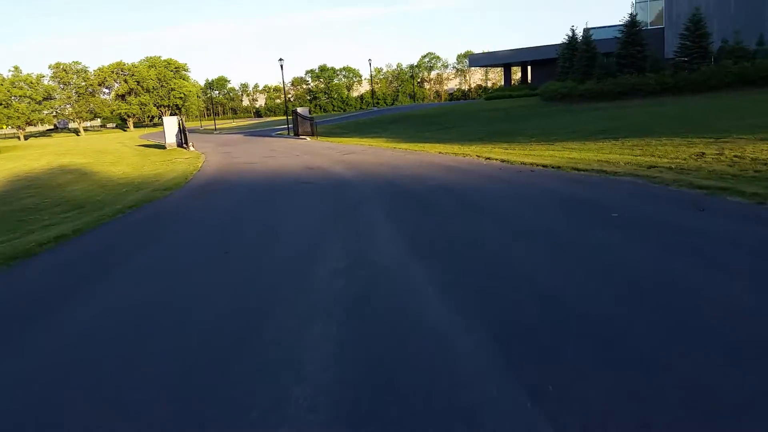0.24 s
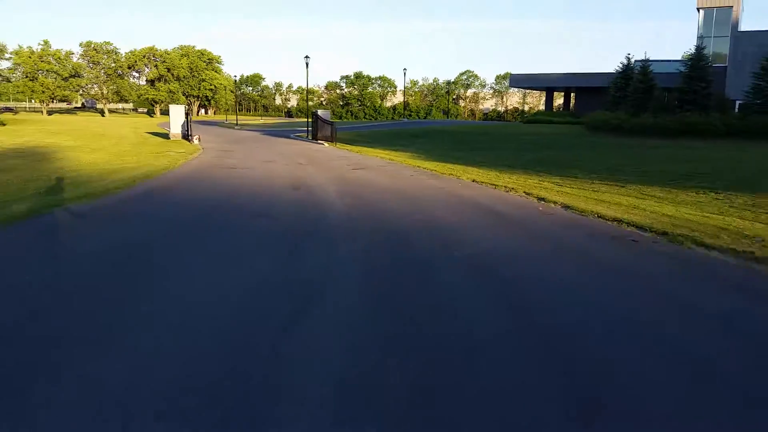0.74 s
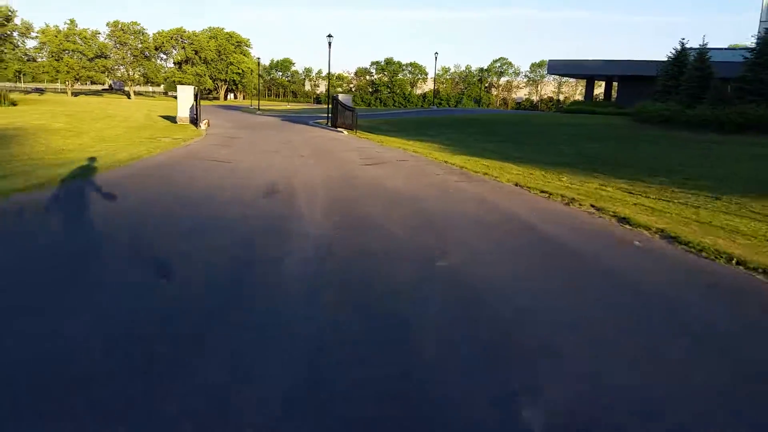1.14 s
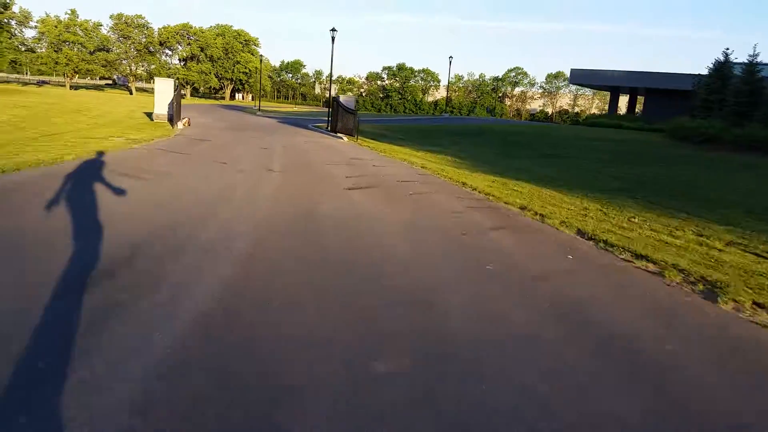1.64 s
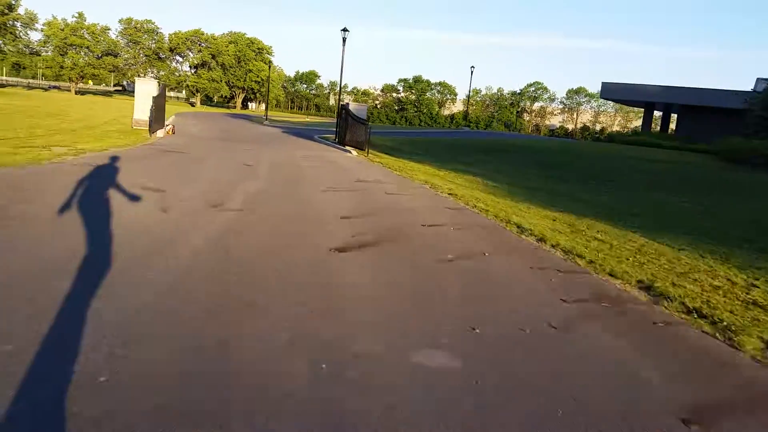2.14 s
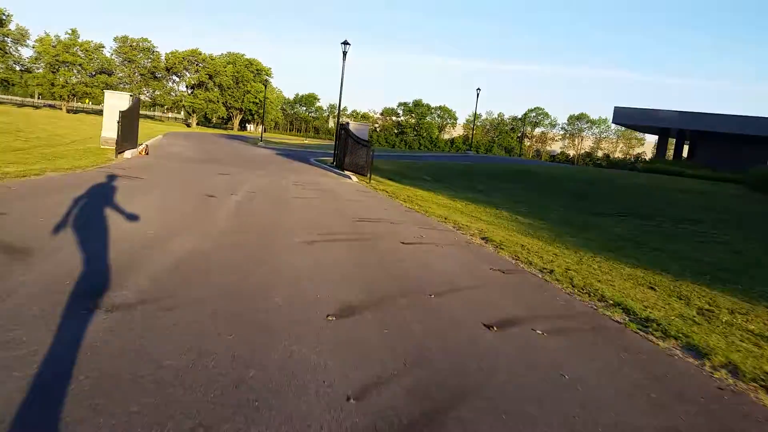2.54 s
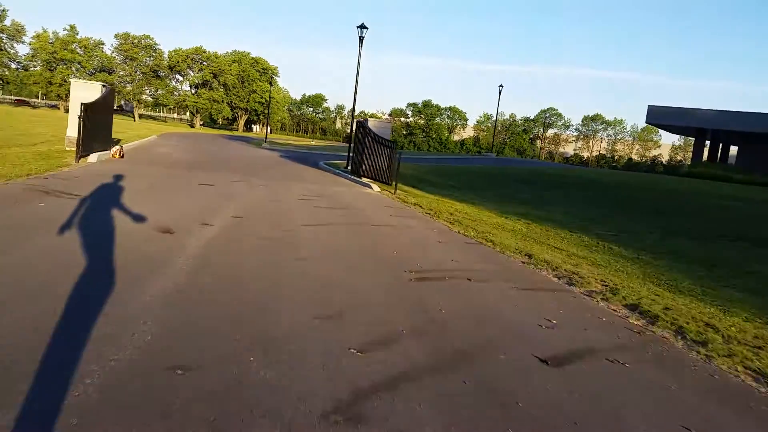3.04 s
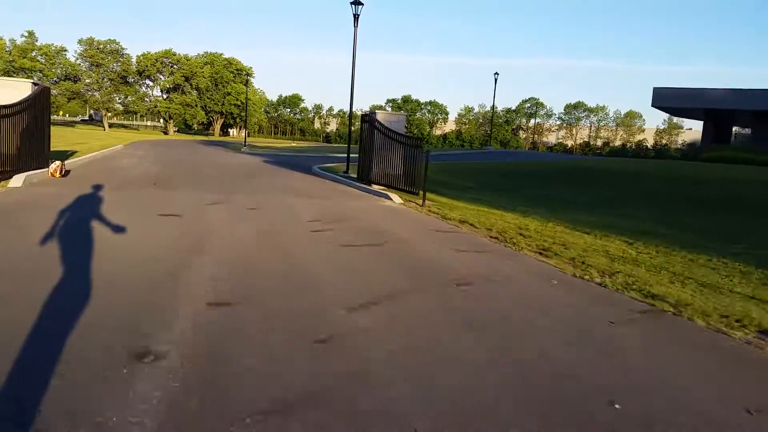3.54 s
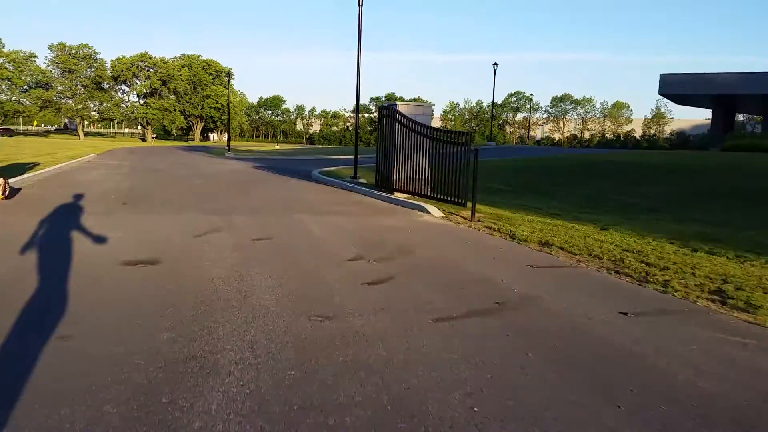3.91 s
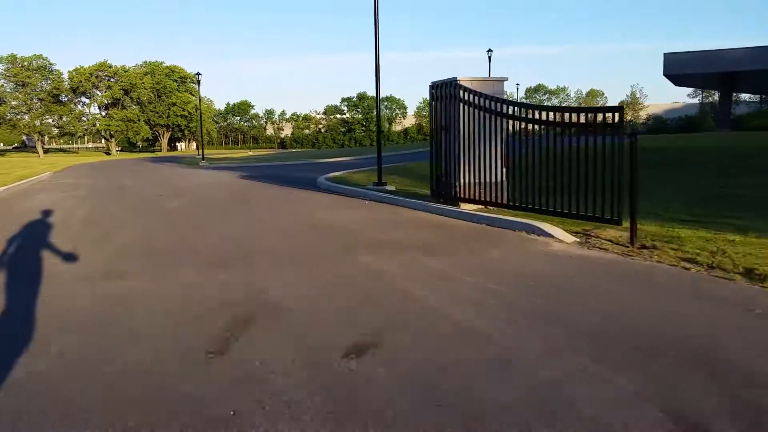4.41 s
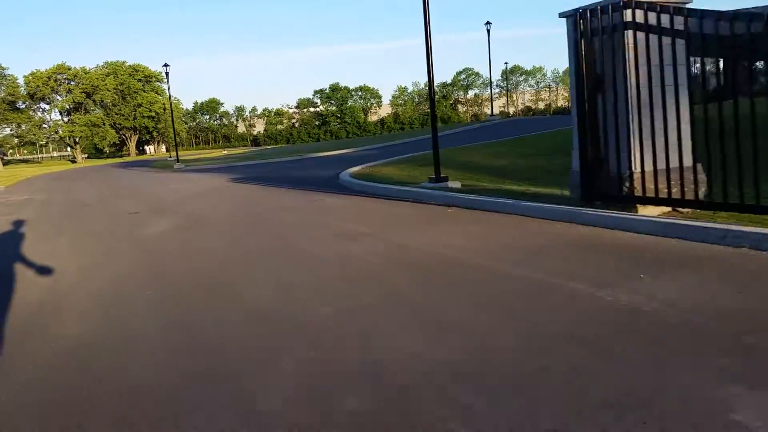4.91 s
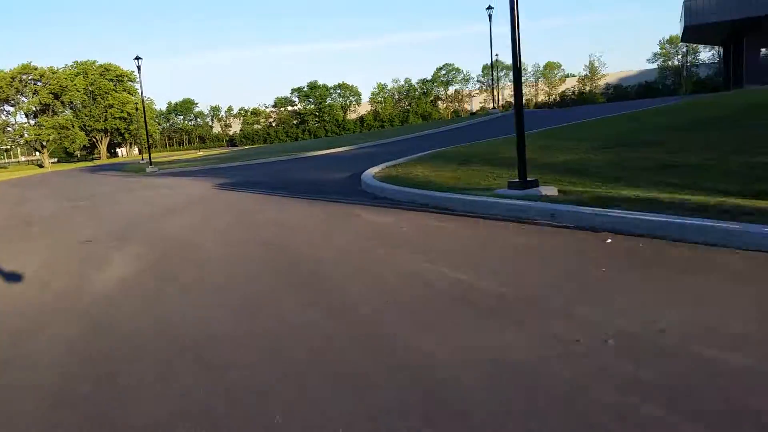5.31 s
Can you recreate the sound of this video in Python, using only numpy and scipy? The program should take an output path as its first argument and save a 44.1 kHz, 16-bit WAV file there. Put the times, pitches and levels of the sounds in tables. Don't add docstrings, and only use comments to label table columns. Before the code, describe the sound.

Continuous loud low wind covers a skateboard rolling on smooth asphalt. Pops and fluttering gusts crowd both channels for the first two and a half seconds, then wind leans left and the right grows quieter. A hollow mid-pitched wheel hum and fine sand crackle persist, faint falling bird whistles slip through, and two heavy left thumps land around five seconds.

```python
import sys
import numpy as np
from scipy import signal
from scipy.fft import rfft, irfft, next_fast_len
from scipy.io import wavfile
from scipy.ndimage import uniform_filter1d, minimum_filter1d

SR = 44100
rng = np.random.default_rng(int(sys.argv[2]) if len(sys.argv) > 2 else 0)


def transcribe(signal):
    frames = np.atleast_2d(signal).T
    limited = np.clip(frames, -1, 1)
    pcm = np.round(limited * 32767).astype(np.int16)
    wavfile.write(sys.argv[1], SR, pcm)


def rack_gain(trim_db):
    fader = np.asarray(trim_db, float)
    return 10 ** (fader / 20)


N = 245181

# time_s, push_left_db, push_right_db, churn_left_db
AIRSTREAM = [(0, -16, -16.5, -35), (.35, -17, -20, -32), (.7, -19.5, -16, -36.5), (1.05, -14, -15.5, -30),
             (1.3, -16, -15, -35), (1.55, -12, -14, -29), (1.9, -14.5, -15, -29.5),
             (2.3, -11.5, -15.5, -30), (2.5, -12.5, -17.5, -32), (2.75, -12.5, -22, -36.5),
             (3.2, -16, -21, -41.5), (3.5, -15, -22.5, -47), (4.0, -14, -21, -42), (4.2, -13.5, -22.5, -39),
             (4.6, -11, -21, -38.5), (4.95, -10.5, -25, -37.5), (5.2, -13.5, -27.5, -36),
             (5.56, -14.5, -22.5, -40.5)]
LAYER_CENTRES_HZ = [70, 140, 410, 1970]
PUSH_SLOPE_LEFT = [1.256, 1.07, 0.073, .05]
CHURN_SLOPE_LEFT = [-0.098, -0.033, 0.14, 0.93]
PUSH_SLOPE_RIGHT = [1.012, 0.94, 1.7, 1.9]
# freq_hz, density_db_per_hz
WIND_COLOUR_LEFT = [(20, -22.5), (35, -24), (60, -0.5), (90, 2), (140, -2), (220, -8.5), (330, -13.5),
                    (500, -17.5), (750, -25.5), (1100, -26.5), (1700, -38.5), (2500, -46), (3700, -61.5),
                    (4650, -63), (5500, -70.5)]
WIND_COLOUR_RIGHT = [(20, -26.5), (35, -4.5), (60, -4.5), (90, -4), (140, 3), (220, -3), (330, -7.5),
                     (500, -9.5), (750, -23), (1100, -26), (1700, -44), (2500, -51.5), (3700, -71),
                     (4650, -77), (5500, -72.5)]
# freq_hz, shared_burst_db, own_flicker_db
GUSTINESS = [(30, 1, 0), (153, 0.36, 0), (534, 2.5, 1.5), (1520, 1, 0.5), (5000, 2, 1.2)]
# peak_s, peak_db
POPS_LEFT = [(0.0002, -22), (0.0937, -26), (0.1607, -26), (0.1649, -16), (0.1713, -25), (0.177, -27),
             (0.3172, -35), (0.8493, -21), (1.0204, -19), (1.0771, -27), (1.102, -29), (1.2575, -23),
             (1.2872, -23), (1.3139, -22), (1.5499, -22), (1.688, -25), (1.7449, -20), (1.7677, -25),
             (1.7729, -16), (1.9788, -29), (2.0582, -24), (2.1209, -25), (2.1443, -16.5), (2.1548, -25),
             (2.1854, -22), (2.2586, -25), (2.3158, -23), (2.3495, -18), (2.3542, -29), (2.3812, -21),
             (2.5378, -19), (2.5509, -23), (2.5725, -21), (2.5786, -20), (2.6475, -28), (2.6707, -27),
             (2.6801, -22), (2.7034, -22), (3.0577, -22), (3.0948, -28), (3.1547, -21), (3.1589, -24),
             (4.7402, -17), (4.7551, -27), (4.9032, -26), (5.0394, -19), (5.0996, -19), (5.1045, -18.5),
             (5.1349, -24), (5.2804, -21), (5.3464, -31), (5.4092, -28), (5.4198, -20.5), (5.4308, -26),
             (5.4931, -21), (5.5031, -19), (5.5072, -23), (5.5126, -29)]
POPS_RIGHT = [(0.0009, -33), (0.1609, -28), (0.4003, -29), (0.4313, -38), (0.6555, -28), (0.6798, -39),
              (0.7199, -35), (0.8553, -33), (0.8623, -33), (0.8673, -19), (0.8949, -32), (0.9411, -31),
              (0.9463, -20), (1.0092, -30), (1.0337, -27), (1.0873, -26), (1.103, -32), (1.1717, -34),
              (1.2551, -30), (1.3992, -32), (1.4384, -36), (1.4439, -35), (1.4517, -27), (1.4751, -26),
              (1.5344, -33), (1.5846, -27), (1.6052, -23), (1.6139, -34), (1.6834, -30), (1.6963, -30),
              (1.7178, -27), (1.723, -22), (1.7454, -32), (1.7919, -26), (1.8354, -30), (1.8665, -27),
              (1.8738, -31), (1.8849, -34), (1.911, -31), (1.9306, -32), (1.9765, -29), (2.0068, -33),
              (2.0685, -35), (2.1023, -34), (2.1117, -29), (2.1667, -34), (2.172, -23), (2.1905, -29),
              (2.249, -33), (2.26, -19), (2.2672, -34), (2.4403, -33), (2.4828, -34), (2.8088, -42),
              (3.0634, -29), (3.3688, -43), (4.2079, -37), (5.1904, -41)]
# peak_s, peak_db
THUMPS_LEFT = [
    (0.715, -34),
    (2.506, -27),
    (2.845, -20),
    (2.911, -14),
    (2.989, -8.5),
    (3.53, -42),
    (4.859, -2),
    (4.904, -16),
    (5.07, -1),
    (5.156, -21),
]
# peak_s, peak_db
FLURRIES_LEFT = [(0.854, -22.5), (1.4784, -21), (1.494, -21), (1.5155, -18), (1.53, -23), (2.02, -17),
                 (2.0553, -17), (2.1988, -16), (2.42, -15), (2.46, -19.5), (2.845, -24.5), (2.87, -19.5),
                 (2.886, -26), (3.955, -25), (4.49, -23), (5.185, -31)]
# time_s, deck_drone_db, wheel_ring_db
ROLLING = [(0, -28, -24), (.12, -25, -24.5), (.7, -22, -30), (.9, -23, -20.5), (1.04, -27.5, -31),
           (1.18, -23, -37), (1.28, -13, -20), (1.36, -24, -26), (1.9, -21.5, -24), (2.14, -25.5, -22),
           (2.42, -19.5, -24.5), (2.5, -28.5, -27), (3.1, -25.5, -26.5), (3.8, -25, -22), (4.17, -25, -21),
           (4.45, -31.5, -21), (4.95, -28.5, -29.5), (5.56, -30, -22.5)]
# centre_hz, width_hz, left_db, right_db
DECK_MODES = [
    (420.3, 86.5, -2.0, -5),
    (567, 55, -16.5, -27),
]
WHEEL_MODES = [
    (907, 106, -14.5, -20.5),
    (1164, 100, -26.5, -30.5),
    (2120, 357, -22, -33.5),
    (4370, 1200, -45.5, -52),
]
# time_s, level_db
SAND = [(0.0, -57), (0.36, -60.5), (1.39, -58), (1.75, -61), (1.93, -63), (2.35, -60), (2.72, -68),
        (2.96, -69), (3.22, -66), (3.58, -62.5), (3.98, -58.5), (4.37, -56), (4.57, -55.5), (4.74, -58.5),
        (4.99, -59), (5.23, -55.5), (5.45, -59), (5.56, -62.5)]
# start_s, over_hiss_db
PATCHES = [(0.541, 3), (0.654, 5.5), (0.938, 6.5), (1.12, 5.5), (1.398, 10.5), (2.046, 8), (2.661, 8),
           (2.976, 9.5), (3.331, 6.5), (3.788, 12), (3.803, -1.5), (3.959, 14), (3.987, 6), (4.037, 2),
           (4.287, 10), (4.642, 2.5), (4.701, 6.5), (5.183, 8)]
# freq_hz, density_db_per_hz
GRIT_COLOUR_LEFT = [(3000, -13), (4000, 0), (4650, -5.5), (5000, -34.5), (5600, -9), (6600, -10), (7600, 0),
                    (8600, -7), (10000, -11.5), (11200, -6.5), (12300, -1), (13800, -9), (15000, -5.5),
                    (15700, -1)]
GRIT_COLOUR_RIGHT = [(3000, -4), (4200, -7.5), (5300, -20), (6500, -15), (7600, -24.5), (8600, -24.5),
                     (10000, -34.5), (11200, -18), (12300, -10.5), (13800, -5.5), (15000, -1), (15600, 2.5)]
# time_s, pitch_hz, level_db
BIRD_CALLS = [
    [(.77, 4680, -70), (.795, 4340, -59), (.82, 4090, -72), (.86, 3850, -67), (.92, 3660, -61),
     (1.0, 3480, -58.5), (1.07, 3340, -62), (1.1, 3290, -66), (1.145, 3250, -63)],
    [(.70, 3750, -72), (.76, 3500, -70), (.85, 3320, -70), (.95, 3170, -72)],
    [(1.32, 4260, -65), (1.345, 4100, -59), (1.362, 3960, -67), (1.40, 3810, -60), (1.465, 3700, -65)],
    [(2.77, 3950, -75), (2.82, 3720, -74), (2.89, 3450, -75)],
    [(2.905, 6700, -78), (2.93, 6580, -76), (2.955, 6450, -78)],
    [(3.035, 5250, -70), (3.06, 5030, -68), (3.11, 4900, -67), (3.165, 4940, -59.5), (3.2, 5040, -63),
     (3.235, 5110, -75)],
    [(3.59, 4170, -66), (3.615, 4030, -62), (3.64, 3840, -68), (3.685, 3600, -74)],
]

PORT_LAG_S, PORT_FLIP_HZ = .00014, 11000
NOTCH_HZ, NOTCH_WIDTH_HZ, NOTCH_DEPTH = 5300, 600, .45
POP_LEAD_S, POP_TOP_HZ = .0004, 2400
FRAY_SHARE = .05
THROB_CEILING = 1.31
SWAY_DB, SWAY_PER_S = 1.5, 4
GRIT_TURN_DB_PER_DB = .22
TOP_CUT_HZ = 15850


def unit(x):
    return x / np.sqrt(np.mean(x ** 2) + 1e-20)


def in_time(rows):
    time_s, *columns = np.transpose(rows)
    return [np.interp(np.arange(N) / SR, time_s, column) for column in columns]


def at_hz(points, hz, order=1):
    points = np.array(points)
    return np.interp(np.log(hz), np.log(points[:, 0]), points[:, order])


def drift(rate_hz):
    r = np.exp(-40 * np.pi * rate_hz / SR)
    noise = rng.standard_normal(N // 20 + 2002)
    slow = signal.lfilter([1], [1, -2 * r, r * r], noise)[2000:]
    return np.interp(np.arange(N) / 20, np.arange(len(slow)), unit(slow))


def coloured(x, colour, slope_db):
    size = next_fast_len(N, real=True)
    hz = np.fft.rfftfreq(size, 1 / SR) + 1
    octaves_above = np.maximum(np.log2(hz / colour[-1][0]), 0)
    octaves_below = np.maximum(np.log2(colour[0][0] / hz), 0)
    shape_db = at_hz(colour, hz) - slope_db * (octaves_above + octaves_below)
    return hz, rfft(x, size) * rack_gain(shape_db)


def wave(spectrum):
    return irfft(spectrum)[:N]


def resonance(x, hz, width_hz):
    r = np.exp(-np.pi * width_hz / SR)
    poles = [1, -2 * r * np.cos(2 * np.pi * hz / SR), r * r]
    return signal.lfilter([(1 - r * r) / 2, 0, (r * r - 1) / 2], poles, x)


def grains(per_s, spread_db):
    size_db = spread_db * np.minimum(rng.exponential(1, N), 5)
    clicks = rack_gain(size_db) * rng.choice([-1, 1], N)
    return unit(clicks * (rng.random(N) < per_s / SR))


def delayed(x, lag_s):
    return np.interp(np.arange(N) - lag_s * SR, np.arange(N), x)


def low_or_high(x, order, edge_hz, kind="low"):
    return signal.sosfilt(signal.butter(order, edge_hz, kind, fs=SR, output="sos"), x)


def airstream():
    push_left_db, push_right_db, churn_db = in_time(AIRSTREAM)
    left_db = np.outer(PUSH_SLOPE_LEFT, push_left_db) + np.outer(CHURN_SLOPE_LEFT, churn_db)
    right_db = np.outer(PUSH_SLOPE_RIGHT, push_right_db)
    return [port_db + SWAY_DB * np.array([drift(SWAY_PER_S) for layer in port_db])
            for port_db in (left_db, right_db)]


def wind(levels_db, colour, trim_db):
    mean_db = 10 * np.log10(np.mean(rack_gain(2 * levels_db), axis=1))
    layers = np.arange(len(levels_db))
    stirring = .85 * rng.standard_normal(N) + .6 * grains(500, spread_db=3.2)
    hz, spectrum = coloured(stirring, colour, slope_db=23.5)
    bursts = np.clip(.6 * drift(36) + .6 * drift(120), -2, 2)
    out = 0
    for centre_hz in 35 * 2. ** np.arange(9):
        octaves_away = np.clip(np.log2(np.clip(hz, 35, 8960) / centre_hz), -1, 1)
        band = wave(spectrum * np.cos(octaves_away * np.pi / 2) ** 2)
        if centre_hz < 100:
            ceiling = THROB_CEILING * band.std()
            band = 1.25 * ceiling * np.tanh(band / ceiling)
        place = np.interp(np.log(centre_hz), np.log(LAYER_CENTRES_HZ), layers)
        weights = np.maximum(1 - abs(place - layers), 0)
        swell_db = weights @ (levels_db - mean_db[:, None])
        flicker_db = at_hz(GUSTINESS, centre_hz) * bursts + at_hz(GUSTINESS, centre_hz, order=2) * drift(12)
        out = out + band * rack_gain(swell_db + flicker_db)
    return unit(out) * rack_gain(mean_db[0] + trim_db)


def pops(events, gain_db, cut_hz, ragged_share):
    peak_s, peak_db = np.transpose(events)
    strikes = np.zeros(N)
    at = np.maximum((peak_s - POP_LEAD_S) * SR, 0).astype(int)
    strikes[at] = rack_gain(peak_db + gain_db) * rng.choice([-1, 1], len(events))
    tail = signal.lfilter([1], [1, -np.exp(-1 / (.008 * SR))], strikes + 1e-18)
    ragged = tail * grains(2500, spread_db=3.0)
    puffs = low_or_high(strikes + ragged_share * ragged, 1, 250, "high")
    return low_or_high(low_or_high(puffs, 2, cut_hz), 3, POP_TOP_HZ)


def body(modes, level_db):
    road = grains(4000, spread_db=4.0) * rack_gain(level_db + .5 * drift(2.3))
    other = grains(2700, spread_db=5.0) * rack_gain(level_db)
    out = np.zeros((2, N))
    for hz, width_hz, left_db, right_db in modes:
        pole_hz = width_hz * 1.5
        near, diffuse = (resonance(resonance(x, hz, pole_hz), hz, pole_hz) for x in (road, other))
        scale = np.sqrt(SR / 2 / width_hz)
        out[0] += scale * rack_gain(left_db) * near
        out[1] += scale * rack_gain(right_db) * (.95 * delayed(near, PORT_LAG_S) + .3 * diffuse)
    return out


def grit():
    left_db, = in_time(SAND)
    push_left_db, push_right_db, _ = in_time(AIRSTREAM)
    right_db = left_db - GRIT_TURN_DB_PER_DB * (push_left_db - push_right_db)
    swell_db = np.zeros(N)
    for start_s, over_db in PATCHES:
        swell_db[round(start_s * SR)] = .6 * over_db
    swell_db = signal.lfilter([1], [1, -np.exp(-1 / (.015 * SR))], swell_db + 1e-18)
    flicker = rack_gain(swell_db + .6 * drift(9) + 1.5 * drift(70))
    common = .6 * grains(12000, spread_db=2.2)
    hz, left = coloured(common + .9 * grains(9000, spread_db=2.6), GRIT_COLOUR_LEFT, slope_db=24)
    hz, right = coloured(common + .9 * grains(9000, spread_db=2.6), GRIT_COLOUR_RIGHT, slope_db=24)
    right = right * np.sign(hz - PORT_FLIP_HZ)
    left = unit(wave(left)) * rack_gain(left_db + 7)
    right = unit(wave(right)) * rack_gain(right_db + 8)
    return flicker * np.array([left, right])


def birds():
    out, t = np.zeros(N), np.arange(N) / SR
    for call in BIRD_CALLS:
        pitch_hz, level_db = in_time(call)
        fade = np.clip(np.minimum(t - call[0][0], call[-1][0] - t) / .012, 0, 1)
        tone = np.sin(2 * np.pi * np.cumsum(pitch_hz) / SR)
        out += fade * rack_gain(level_db + 7.5 + 1.2 * drift(30)) * tone
    out = out + rack_gain(-18) * delayed(out, .04)
    return np.array([rack_gain(2.5) * out, rack_gain(-7) * delayed(out, .0001)])


def scene():
    deck_db, wheel_db = in_time(ROLLING)
    levels_left_db, levels_right_db = airstream()
    left = wind(levels_left_db, WIND_COLOUR_LEFT, trim_db=2)
    left = left + pops(POPS_LEFT, gain_db=33.5, cut_hz=1150, ragged_share=FRAY_SHARE)
    left = left + pops(THUMPS_LEFT, gain_db=29, cut_hz=480, ragged_share=.031)
    left = left + pops(FLURRIES_LEFT, gain_db=9, cut_hz=1660, ragged_share=.88)
    right = wind(levels_right_db, WIND_COLOUR_RIGHT, trim_db=2.5)
    right = right + pops(POPS_RIGHT, gain_db=37, cut_hz=800, ragged_share=FRAY_SHARE)
    rolling = body(DECK_MODES, deck_db) + body(WHEEL_MODES, wheel_db)
    return np.array([left, right]) + rolling + grit() + birds()


def low_pass(x):
    return signal.sosfilt(signal.butter(12, 17110, fs=SR, output="sos"), x)


def record(dry):
    dry = dry - NOTCH_DEPTH * resonance(dry, NOTCH_HZ, NOTCH_WIDTH_HZ)
    room = np.minimum(1, .95 / (abs(dry).max(axis=0) + 1e-9))
    gain = uniform_filter1d(minimum_filter1d(room, size=441), size=441)
    size = next_fast_len(N + 2000, real=True)
    held = np.pad(dry * gain, [(0, 0), (1000, size - N - 1000)], mode="reflect")
    passed = np.fft.rfftfreq(size, 1 / SR) < TOP_CUT_HZ
    mix = irfft(rfft(held) * passed, size)[:, 1000:N + 1000]
    return low_pass(mix)


dry = scene()
out = record(dry)
transcribe(out)
```